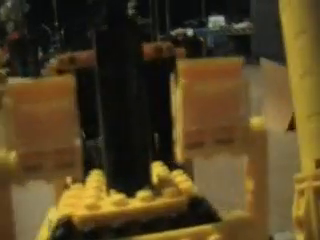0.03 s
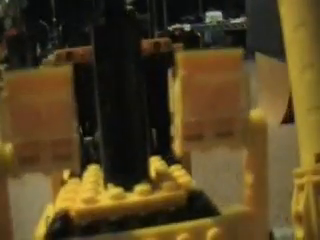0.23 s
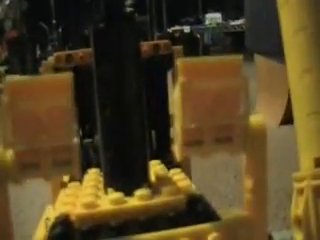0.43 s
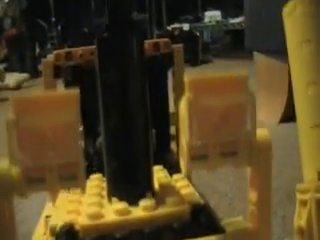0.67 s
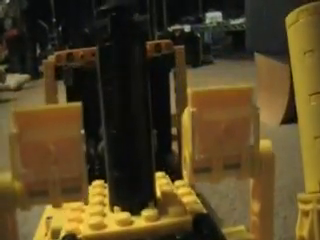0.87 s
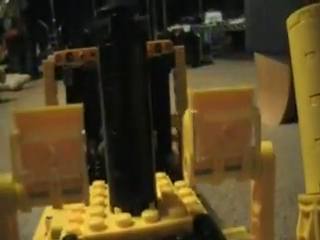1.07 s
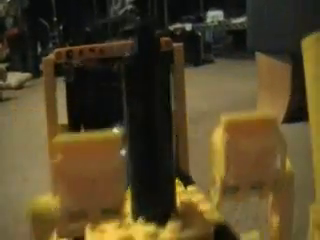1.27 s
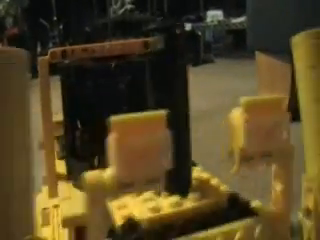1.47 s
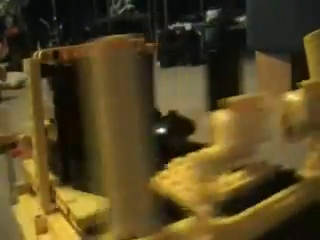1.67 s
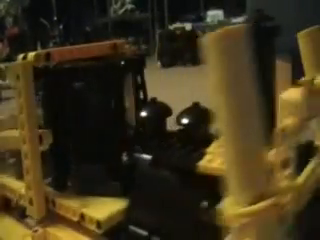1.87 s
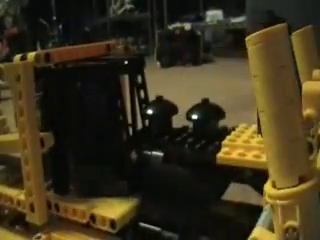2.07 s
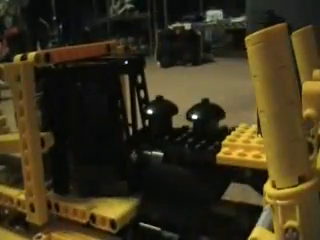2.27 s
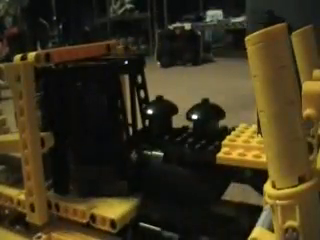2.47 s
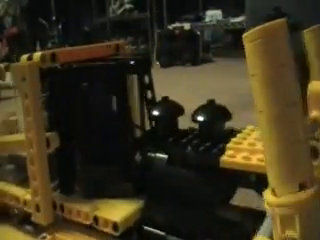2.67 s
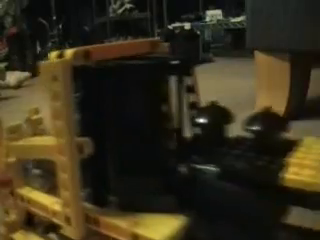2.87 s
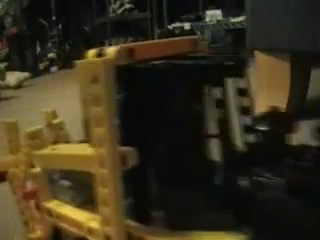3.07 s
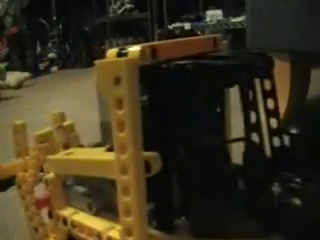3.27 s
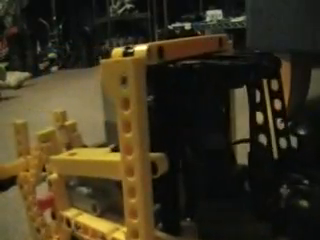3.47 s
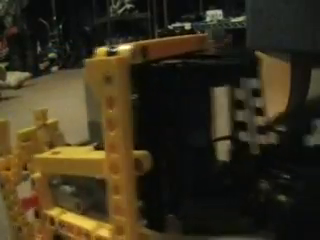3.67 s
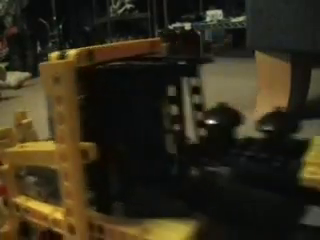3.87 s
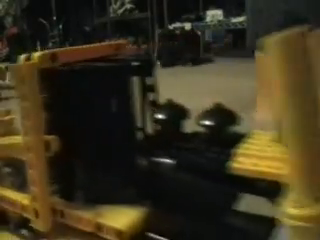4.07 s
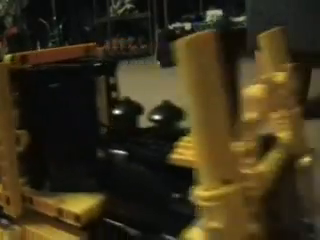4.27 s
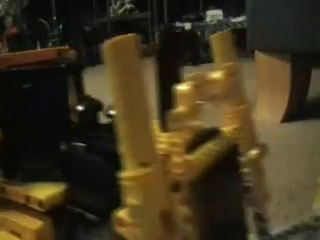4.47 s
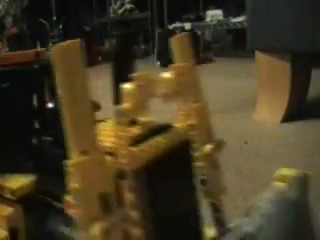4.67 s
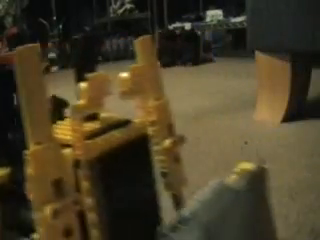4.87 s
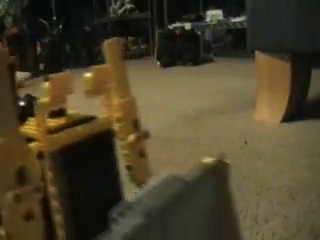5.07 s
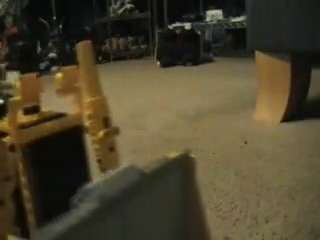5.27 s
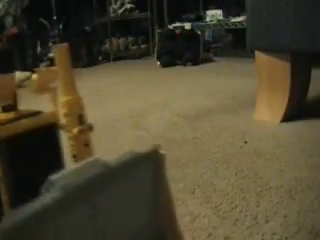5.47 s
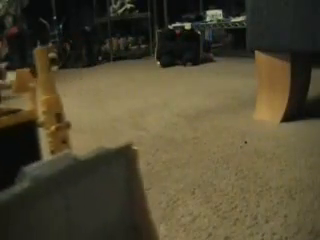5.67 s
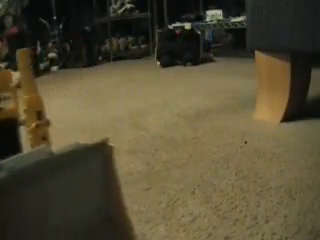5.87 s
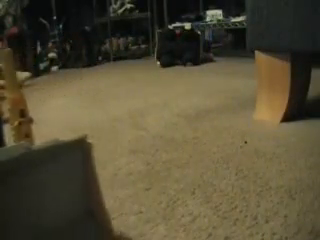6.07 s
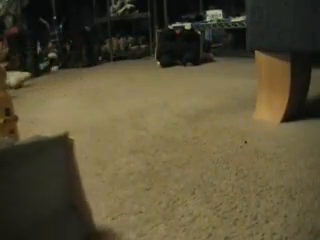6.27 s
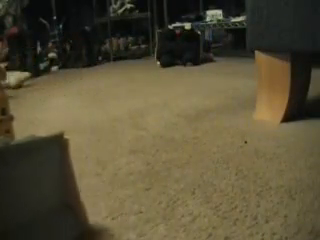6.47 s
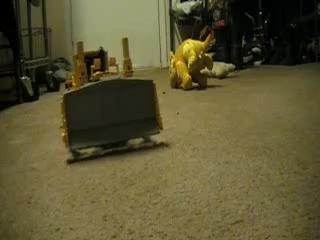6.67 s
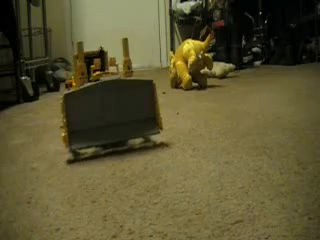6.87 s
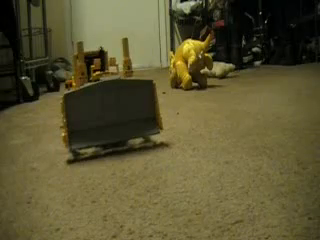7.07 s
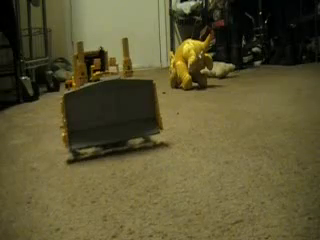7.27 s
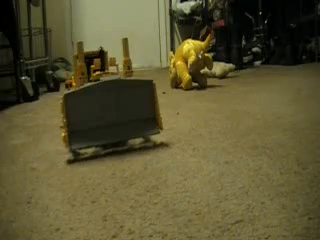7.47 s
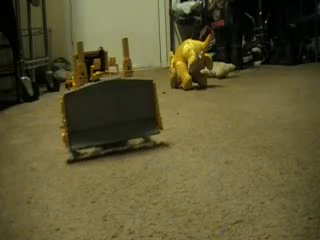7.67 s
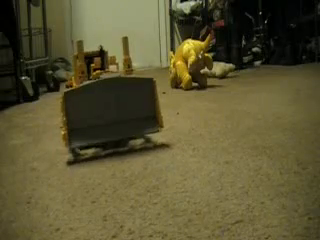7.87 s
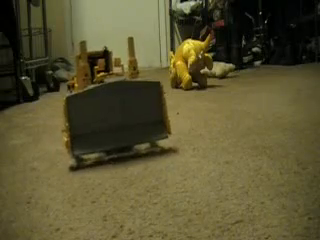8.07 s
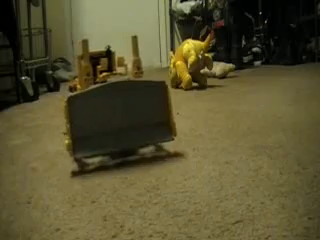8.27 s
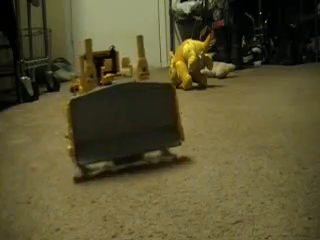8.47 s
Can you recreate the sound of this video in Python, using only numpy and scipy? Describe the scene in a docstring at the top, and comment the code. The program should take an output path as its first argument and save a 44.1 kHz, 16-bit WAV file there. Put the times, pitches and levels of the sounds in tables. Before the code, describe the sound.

Small electric motors and plastic gears whine in jerky runs with ticks and track clatter, near at first, then fainter after a brief dip.

```python
"""A toy bulldozer of plastic bricks jerks about on a carpet close to the microphone, in a room with soft air noise.
Two motors spin up, sag under load and coast; meshing teeth whine and chatter, track links clatter as blow trains,
friction rubs and grinds, a blocked gear ratchets, and loose parts knock and tick as short noise bursts.
The toy turns side-on near 1.6 s, passes near 4.2 s and moves away, its parts fading by powers of distance.
The level dips briefly at 6.7 s and the run in hand ends; then the toy, further off, twitches and drives off again."""
import sys
import numpy as np
from scipy import signal
from scipy.fft import rfft, irfft, next_fast_len
from scipy.io import wavfile
from scipy.ndimage import uniform_filter1d

SR = 44100
rng = np.random.default_rng(int(sys.argv[2]) if len(sys.argv) > 2 else 0)


def master(y):
    """Save y as 16-bit WAV."""
    cut = np.clip(np.atleast_2d(y).T, -1, 1)
    pcm = np.round(cut * 32767)  # scale
    wavfile.write(sys.argv[1], SR, pcm.astype(np.int16))


N = 375732
T = np.arange(N) / SR  # time [s]
DIP_S = (6.695, 6.725)  # start and end of the brief dip in level

# presses of the throttle, levels before distance and mix gains: (on [s], off [s], standstill [s],
# pick-up time constant [s], frame level [dB], teeth level [dB], track level [dB])
THROTTLE_RUNS = [(-.3, 0.365, 0.46, 0.032, -27.5, -30, -40.5), (0.571, 0.663, 0.71, 0.041, -40, -44, -44),
                 (0.714, 0.888, 1.014, 0.023, -43, -47, -44),
                 (1.187, 2.011, 2.17, 0.037, -27, -30.5, -39.5),
                 (2.647, 3.279, 3.5, .13, -30, -32.5, -38.5), (3.559, 6.37, 6.755, 0.11, -27, -30.5, -38),
                 (6.925, 6.98, 7.03, 0.03, -26, -31.5, -50), (7.029, 7.219, 7.6, 0.007, -47, -55.5, -59),
                 (7.827, 8.6, 8.6, 0.11, -27, -31, -40.5)]
# spectrum of the track links: (frequency [Hz], gain [dB])
TRACK_SPECTRUM = [(30, -39), (110, -20), (200, -14), (280, -6), (380, 1.5), (650, 2.5), (1000, 0.5),
                  (1400, 0), (2200, -4), (4000, -36)]
# spectrum of the plastic frame: (frequency [Hz], gain [dB])
FRAME_SPECTRUM = [(100, -58), (900, -28), (1400, -1.5), (1800, -4), (2250, -3), (2700, 0), (3050, -0.5),
                  (3550, 4.5), (4000, 0.5), (4400, 1.5), (5000, -1.5), (6000, -8), (9000, -45.5)]
# spectrum of a sharp tick of small teeth: (frequency [Hz], gain [dB])
TICK_SPECTRUM = [(1000, -21.5), (3500, -14.5), (6400, 3), (8500, -3.5), (11000, -15), (15500, -34.5)]


def undb(db):
    """Decibels to amplitude ratio: 20 dB is a factor of ten."""
    return 10 ** (np.asarray(db) / 20)


def unit(x):
    """Normalisation to a root-mean-square of 1."""
    return x / np.sqrt(np.mean(x ** 2))


def colour(x, points):
    """Linear filtering: each frequency is scaled by a gain interpolated in dB over log frequency."""
    hz, db = np.transpose(points)
    size = next_fast_len(x.shape[-1] + 2048)
    f = np.maximum(np.fft.rfftfreq(size, 1 / SR), 1)
    gain = undb(np.interp(np.log(f), np.log(hz), db))
    return irfft(rfft(x, size) * gain, size)[..., :x.shape[-1]]


def resonance(x, hz, width_hz):
    """Simple resonator: a two-pole band-pass whose Q is centre over bandwidth."""
    return signal.lfilter(*signal.iirpeak(hz, hz / width_hz, fs=SR), x)


def narrow(x, hz, width_hz):
    """Cascaded resonators: the same band-pass twice, for steeper skirts."""
    return resonance(resonance(x, hz, width_hz), hz, width_hz)


def walk(rate):
    """Band-limited fluctuation: a moving average of random steps, rate [1/s], with a spread near 1."""
    hold = max(int(SR / rate), 1)
    steps = np.repeat(rng.standard_normal(N // hold + 1), hold)
    return 1.3 * uniform_filter1d(steps, hold)[:N]


def tone(hz):
    """Phase is the integral of frequency: a sine of rms 1 on a moving pitch."""
    return np.sqrt(2) * np.sin(2 * np.pi * (np.cumsum(hz) / SR + rng.random()))


def room(air_db=0.0):
    """Ambient sound: broadband air noise with a low hum and thin, nearly steady tones; mid and side."""
    # spectrum of the air noise: (frequency [Hz], gain [dB])
    air_spectrum = [(15, -58.5), (25, -35), (38, -25), (96, -17), (129, -10), (209, -11), (233, -6.5),
                    (267, -8.5), (919, -11), (1110, -5.5), (1240, -11.5), (7910, -23.5), (11800, -39),
                    (15500, -46)]
    # room tones: (frequency [Hz], waver [Hz], rms level in the mid [dB])
    room_tones = [(118.9, 1.2, -79.5), (244.4, 2.5, -84.5), (1083, 3, -70), (7770, 110, -77.5)]
    # filter that makes the side of the room: (frequency [Hz], gain [dB])
    room_side = [(60, -3), (110, -3), (200, 0.5), (380, 5.5), (700, 5.5), (1290, 1), (2380, 3.5),
                 (4400, -1.5), (8120, -0.5), (15000, 0)]
    level_db = -62.5 + air_db + 0.81 * walk(4.7)
    air = unit(colour(rng.standard_normal((2, N)), air_spectrum)) * undb(level_db)
    mid, side = (part + sum(undb(db) * tone(hz + waver * walk(3 * waver)) for hz, waver, db in room_tones)
                 for part in air)
    return np.array([mid, colour(side, room_side)])


def throttle():
    """Timing of the drive: time since the latest switch-on [s], and share of its coast done (0-1)."""
    runs = np.array(THROTTLE_RUNS)
    latest = np.maximum(np.searchsorted(runs[:, 0], T) - 1, 0)
    on, off, still, *_ = runs[latest].T
    return np.maximum(T - on, 0), np.clip((T - off) / (still - off), 0, 1)


def effort(on, off, still, pick_up_s, pick_up_power=1.38):
    """Exponential build-up and decay: drive swells, fades while coasting, then slack gears settle."""
    coast_db, settle_db, settle_s = -15, -24.5, 0.22  # level at standstill; level and decay time of settling
    swell = (1 - np.exp(-np.maximum(T - on, 0) / pick_up_s)) ** pick_up_power
    fade = undb(np.interp(T, [off, still, still + 0.013], [0, coast_db, settle_db]))
    settling = np.exp(-np.maximum(T - still, 0) / settle_s)
    # a run begun before the dip ends at its start
    before_dip = T < (DIP_S[0] if on < DIP_S[0] else np.inf)
    return before_dip * swell * fade * settling


def drive_levels(hz, side_on, track_falloff=0.53, frame_falloff=1.006, teeth_falloff=1.694,
                 turned_frame_db=-4, turned_teeth_db=9, teeth_speed_power=1.34):
    """Spreading loss: gains of tracks, frame and teeth follow powers of distance; side-on bares the gears."""
    # the gears bite harder or ease off: (time [s], half length to 1/e of the dB change [s], teeth change [dB])
    surges = [(1.97, 0.066, 1.5), (2.784, 0.075, -4), (2.856, 0.0088, 4.5), (2.924, 0.064, 4),
              (3.134, 0.051, 1.5), (3.678, 0.059, -3.5), (4.07, 0.048, 1)]
    # how far off the toy is: (time [s], distance [m])
    distance = [(0, 0.13), (1.5, 0.16), (1.8, 0.2), (2, 0.17), (3.2, 0.13), (3.8, .16), (4.4, .15),
                (4.8, 0.18), (5.35, 0.3), (6.3, 0.42), (6.75, 0.56), (8.52, 0.58)]
    near_m = 0.14  # the run levels hold at this distance
    free_hz = 887.3  # tooth rate at which the teeth levels hold
    take_up_s, take_up_db = .13, -7  # gears take up their slack before the tracks roll fully
    # overlapping runs add as energies
    energies = sum(np.outer(undb(run[4:]), effort(*run[:4])) ** 2 for run in THROTTLE_RUNS)
    frame, teeth, track = np.sqrt(energies)
    surge_db = sum(db * np.exp(-((T - s) / length) ** 2) for s, length, db in surges)
    near = near_m / np.interp(T, *np.transpose(distance))
    rolling = undb(take_up_db * np.exp(-(throttle()[0] / take_up_s) ** 2))
    speed = (hz / free_hz) ** teeth_speed_power
    return (track * rolling * near ** track_falloff,
            frame * undb(turned_frame_db * side_on) * near ** frame_falloff,
            teeth * undb(surge_db + turned_teeth_db * side_on) * near ** teeth_falloff * speed)


def motor(curve, slack_db=-16, coast_power=1.6):
    """Motor under load: tooth rate, whine level and brightness; it spins up, sags, coasts; slack gears hush."""
    start_hz, stall_hz = 600.7, 542.1  # tooth rates at switch-on and at the end of the coast
    spin_up_s, hunt_hz = .033, 5  # time constant; slow wander
    since, coast = throttle()
    s, *columns = np.transpose(curve)
    loaded_hz, whine_db, bright_db = (np.interp(T, s, column) for column in columns)
    starting = np.exp(-since / spin_up_s)
    running = loaded_hz + (start_hz - loaded_hz) * starting + hunt_hz * walk(12)
    hz = running + (stall_hz - running) * coast ** coast_power
    return hz, whine_db + slack_db * np.maximum(starting, coast), bright_db


def contacts(cycles, scatter_db, jitter, ring_s):
    """Impact train: one blow a cycle, uneven in time and strength, each decaying with time constant ring_s."""
    count = np.arange(int(cycles[-1]))
    chance = rng.standard_normal((16000, 2))[count]
    at = np.interp(count + jitter * chance[:, 0], cycles, np.arange(N)).astype(int)
    energy = np.bincount(at, undb(scatter_db * np.clip(chance[:, 1], -2.5, 2.5)) ** 2, N)
    ringing = signal.lfilter([1], [1, -np.exp(-2 / (ring_s * SR))], energy)
    return unit(np.sqrt(ringing))


def mesh_whine(mesh, orders, bright_db, rasp, waver_db=2.5):
    """Harmonics of the tooth rate: uneven teeth modulate each, and hard biting lifts the upper ones."""
    # spectrum of the whine: (frequency [Hz], gain [dB])
    whine_spectrum = [(600, 2), (1400, -2), (1900, -1.5), (2150, -1.5), (2400, -4.5), (2700, 6),
                      (3100, 4.5), (3550, 4), (4200, 2), (4800, 1), (5400, 3), (6700, 3), (11000, 1.5)]
    gains = [undb(db + bright_db * np.clip(k - 4, -2, 2)) for k, db in orders]
    tones = 0
    for gain, (k, _) in zip(gains, orders):
        uneven = undb(waver_db * walk(70)) * (1 + rasp * walk(350))
        tones = tones + gain * uneven * np.sin(2 * np.pi * (round(k) * mesh + rng.random()))
    return colour(tones / np.sqrt(sum(gain ** 2 for gain in gains)), whine_spectrum)


def gear_train(drive, orders, wobble=0.0046, bind_db=0.8):
    """Gear-mesh modulation: one motor's whine, and the envelopes of its tooth and track-link blows."""
    # how roughly the gears mesh: (time [s], roughness [0-1])
    roughness = [(.4, .48), (1.2, .8), (1.42, .8), (1.55, .55), (2.1, .55), (2.7, .38), (4, .38), (4.3, .5),
                 (6.4, .5), (7.9, .7), (8.5, .55)]
    hz, whine_db, bright_db = drive
    shaft = np.cumsum(hz) / SR / 60 + rng.random()  # turns, of 60 teeth each
    # backlash makes the mesh flutter; an eccentric gear speeds and slows it once a shaft turn
    rough = np.clip(np.interp(T, *np.transpose(roughness)), 0, 1)
    flutter = .015 * rough * walk(200)
    mesh = np.cumsum(hz * (1 + flutter + wobble * np.sin(2 * np.pi * shaft))) / SR
    # tight spots come round again on every turn
    spots = rng.standard_normal(14)
    places = np.arange(len(spots)) / len(spots)
    binding = undb(bind_db * np.interp(shaft, places, unit(spots - spots.mean()), period=1))
    teeth = contacts(mesh, scatter_db=3.0, jitter=0.13, ring_s=0.0028) * binding
    # at a crawl the slack gears catch and let go in separate clicks
    crawl = np.clip((640 - hz) / 130, 0, .7)
    clicks = contacts(mesh / 6, scatter_db=2, jitter=0.7, ring_s=0.0012)
    teeth = np.sqrt((1 - crawl) * teeth ** 2 + crawl * clicks ** 2)
    # the track surges once a shaft turn
    surge = undb(3.2 * np.sin(2 * np.pi * shaft))
    links = contacts(mesh / 4, scatter_db=2.5, jitter=.4, ring_s=0.0189) * surge * binding
    whine = unit(mesh_whine(mesh, orders, bright_db, rough) * binding) * undb(whine_db)
    return whine, teeth, links


def rattle(envelope, spectrum):
    """High modal density: blows on a plastic part ring as shaped noise; rows are mid and side."""
    return unit(colour(envelope * rng.standard_normal((2, N)), spectrum))


def clacks(hz, surge_db=3.5):
    """Impact excitation of modes: three links a shaft turn, one hardest, ring the frame; mid and side."""
    # frame resonances rung by single links: (centre [Hz], width [Hz], level [dB])
    link_modes = [(378, 140, -9), (660, 240, -6), (880, 260, -8.5), (1420, 500, -11), (1785, 400, -7)]
    turns = np.cumsum(hz) / SR / 60
    blows = contacts(3 * turns, scatter_db=1.8, jitter=.15, ring_s=0.011)
    blows = blows * undb(surge_db * np.cos(2 * np.pi * turns))
    return sum(undb(db) * unit(narrow(blows * rng.standard_normal((2, N)), centre, width))
               for centre, width, db in link_modes)


def bulldozer(close, side_on, whine_db=0, track_db=-2.0, clack_db=-3, frame_db=-2.0, teeth_db=-0.35,
              second_db=-6, panel_db=-3, growl_db=-10):
    """Superposition: both gear trains whine and chatter in one frame, over the clatter of the tracks."""
    # load on each motor, slowing as tracks drag and racing as they let go, before spin-up and coasting:
    # (time [s], tooth rate [Hz], whine level [dB], brightness [dB per overtone])
    first_curve = [(0, 927, -2, 5.5), (.06, 915, 1, 3), (.13, 880, -4, 1), (.2, 882, -3, 3),
                   (.26, 898, -5, 0.5), (.33, 900, -1, 0), (.6, 875, -6, -5), (.9, 859.5, -4, -4.5),
                   (1.21, 898, -3, -8.5), (1.28, 925, -5, 1), (1.35, 955, -6, 1), (1.4, 1001, 0, 0),
                   (1.44, 910, -8, 0), (1.54, 900, -1, -1), (1.63, 910, -4.5, -2), (1.77, 895, -7, 0),
                   (1.97, 895, -4, 5.5), (2.67, 780, -12, 0), (2.72, 795, 0, 1), (2.76, 832, 4, 1),
                   (2.81, 816, 2, 1), (2.87, 766, -5, 0), (2.93, 765, 0, -1), (2.975, 812, 6.5, -0.5),
                   (3.045, 876, 4.5, -0.5), (3.16, 891, 5.5, 0), (3.28, 925, 1, 0), (3.42, 915, 3, 0),
                   (3.625, 775, 5, 0), (3.68, 830, 4, 1), (3.735, 770, 2, 0), (3.79, 793, -9, 4),
                   (3.86, 795, -6, 2), (3.96, 844.6, -10, 4), (4.12, 895, -5, 0), (4.22, 872, -1, 1),
                   (4.35, 903, -2, 2), (4.5, 872, -1, 2), (4.68, 892, 0.5, 3), (4.83, 879, 0, -0.5),
                   (5.01, 896, -2, 0), (5.3, 885, -10, -4), (5.6, 888, -6, -2), (5.85, 880, -1, 0),
                   (6.4, 883, -0.5, 1), (6.95, 849.7, -12, 0), (7.2, 888, -10, 1), (7.85, 778, -12, 0.5),
                   (8.04, 776, 1, -1.5), (8.11, 825.4, -2, -0.5), (8.23, 945, 0, 0.5), (8.33, 904, 0, 3),
                   (8.44, 886, 0, 1.5), (8.51, 930, 1, -1)]
    second_curve = [(0, 772, 0.5, -4), (.05, 739, 3.5, -2), (.13, 685, 3.5, -1.5), (.21, 682, 1.5, 0.5),
                    (.28, 635, 2.5, -2), (.36, 633, -1, 0.5), (.6, 600, -21, -4), (.9, 572, -17, -3),
                    (1.24, 793, -5, 0), (1.28, 822, -4, 1), (1.33, 877, -4, 2.5), (1.41, 830, -1, 0.5),
                    (1.5, 854.7, -10, 2), (2, 885, -8.5, 3), (2.72, 805.4, -11, 4.5), (2.9, 900, -2, 2),
                    (3.25, 891, -10, -1), (3.6, 719, -3, 3), (3.635, 760, -1, 2), (3.675, 826, 3, 2),
                    (3.715, 795, 7, 4), (3.755, 675, 5, 6), (3.8, 612.3, 2, 6), (3.87, 630, 1, 5.5),
                    (3.95, 700, 0, 5), (4, 800, -9, 1), (4.06, 930, 0.5, 0), (4.12, 922.5, -7, -3),
                    (4.22, 872, -1.5, 0), (4.35, 903, -1, 0), (4.5, 872, -4, 0), (4.68, 890, 0, 0),
                    (4.83, 878, -4, -1), (5.02, 895, -4, -1), (5.15, 884, -7, -1), (5.3, 890, -4, -2),
                    (5.55, 884, -9, -1), (5.9, 892, -4, -2), (6.4, 882, -6, -1), (7.1, 792, -8, 2.5),
                    (7.95, 799, -3, -5.5), (8.12, 848, -1, 1), (8.22, 909, -6, 5), (8.37, 859, -5, 0.5),
                    (8.52, 929, -5, 2)]
    # overtones of the two gear meshes: (multiple of the tooth rate, level [dB])
    first_orders = [(1, -11), (2, -0.5), (3, -15.5), (4, 5), (5, -4), (6, -6), (7, -3), (8, -13.5),
                    (10, -12)]
    second_orders = [(1, -21), (2, -8.5), (3, 0), (4, -3.5), (5, 0), (6, -4), (7, -7), (8, -8), (9, -18.5),
                     (10, -20.5)]
    # spectra of the tooth chatter, toy alongside and toy ahead: (frequency [Hz], gain [dB])
    chatter_close = [(300, -67.5), (3500, -3), (5000, -7.5), (6000, -1), (6900, 4), (7700, -2), (8500, -4),
                     (10000, -8), (12000, -19), (15500, -34.5)]
    chatter_ahead = [(300, -69), (3500, -32), (5000, -11.5), (6100, -0.5), (7000, 2), (7700, -4),
                     (8800, -1), (10000, -12), (12000, -17), (15500, -35)]
    first, second = motor(first_curve), motor(second_curve)
    track_gain, frame_gain, teeth_gain = drive_levels((first[0] + second[0]) / 2, side_on)
    whine_a, teeth_a, links_a = gear_train(first, first_orders)
    whine_b, teeth_b, links_b = gear_train(second, second_orders)
    teeth = np.hypot(teeth_a, undb(second_db) * teeth_b)
    links = np.hypot(links_a, undb(second_db) * links_b)
    whine = undb(whine_db) * (whine_a + whine_b)
    frame = np.outer([1, 0], whine) + rattle(teeth, FRAME_SPECTRUM)  # the whine is in the mid alone
    # a panel ring stands out at first and fades from 1.8 to 2.6 s
    panel = np.interp(T, [1.8, 2.6], [1, 0]) * resonance(frame, 1770, 250)
    frame = frame + undb(panel_db) * panel
    chatter = np.sqrt(close) * rattle(teeth, chatter_close) + np.sqrt(1 - close) * rattle(teeth, chatter_ahead)
    clatter = undb(track_db) * rattle(links, TRACK_SPECTRUM) + undb(clack_db) * clacks(first[0])
    # after the dip, further off, the tracks also growl in the hollow body
    growl = unit(narrow(links * rng.standard_normal((2, N)), 375, 150))
    clatter = clatter + undb(growl_db) * (T > DIP_S[1]) * growl
    return track_gain * clatter + undb(frame_db) * frame_gain * frame + undb(teeth_db) * teeth_gain * chatter


def rubs():
    """Friction-driven resonance: noise feeds one band, swelling and fading; mid and side."""
    # low drags on the carpet, dry scrapes and thin axle squeaks:
    # (centre time [s], half length to 1/e^2 [s], centre [Hz], width [Hz], rms level at the crest [dB])
    rub_events = [(.2, 0.45, 176, 70, -60.5), (0.303, .016, 6600, 150, -30),
                  (0.391, 0.0037, 6510, 400, -25), (0.55, .09, 1720, 600, -57), (0.54, .1, 3550, 700, -60),
                  (0.5, .12, 430, 250, -62), (0.73, 0.18, 1700, 650, -52.5), (0.67, .08, 3705, 400, -47),
                  (0.838, 0.11, 202.2, 70.4, -53.5), (0.882, 0.058, 890, 604.3, -40),
                  (1.426, 0.27, 180, 70, -60.5), (2.17, .06, 2500, 5000, -47),
                  (2.273, 0.26, 900, 1600, -57), (2.32, 0.07, 4350, 5800, -62.5),
                  (6.674, .022, 1700, 2000, -47), (6.678, 0.018, 150, 80.2, -54),
                  (2.715, .03, 730, 160, -48), (3.3, .14, 3600, 420, -37), (4.07, .05, 6550, 450, -30),
                  (6.997, .014, 5030, 300, -48), (7.148, 0.15, 450, 220, -67), (7.18, .15, 2430, 380, -63),
                  (7.18, 0.18, 4420, 350, -63.5), (7.159, .17, 5400, 603, -65),
                  (7.415, 0.073, 5200, 3000, -65)]
    out = np.zeros((2, N))
    for s, length, hz, width, db in rub_events:
        ring = narrow(rng.standard_normal((2, N)), hz, width)
        out += undb(db) * unit(ring) * np.exp(-2 * ((T - s) / length) ** 2)
    return out


def jolts():
    """Simultaneous impacts: a track catches and jumps, shaking all its links at once; mid and side."""
    # jolts of the tracks: (centre time [s], half length to 1/e [s], mid level [dB], side minus mid [dB])
    jolt_events = [(0.146, 0.015, -25.5, 3), (0.358, 0.06, -39, -1.5), (1.245, .025, -40, -2),
                   (1.369, 0.022, -33.5, 0), (1.47, 0.013, -29, 2), (1.567, .015, -34, 0),
                   (1.651, .012, -35, -13), (1.767, .012, -35, -8), (2.099, 0.063, -44, -15),
                   (2.928, 0.043, -34, 6.5), (3.245, 0.0058, -29, -18), (3.58, 0.062, -51.5, -12),
                   (3.994, 0.17, -39.5, -21), (6.659, 0.021, -49, -15.5)]
    mid, side = unit(colour(rng.standard_normal((2, N)), TRACK_SPECTRUM))
    gain, side_gain = sum(np.outer(undb([db, db + width_db]), np.exp(-((T - s) / length) ** 2))
                          for s, length, db, width_db in jolt_events)
    return np.array([gain * mid, side_gain * unit(narrow(side, 750, 700))])


def blow(t60, tail_db, tail_t60):
    """Two-stage decay: a noise burst dies fast over a faint longer tail, times to -60 dB [s]; mid and side."""
    t = T[:SR // 4]
    decay = undb(-60 * t / t60) + undb(tail_db - 60 * t / tail_t60)
    return rng.standard_normal((2, len(t))) * decay


def add(out, s, sound, db):
    """Superposition: mix in a sound at a time [s], its mid scaled to a peak level [dB]."""
    i = int(s * SR)
    out[:, i:i + sound.shape[1]] += (undb(db) * sound / np.abs(sound[0]).max())[:, :N - i]


def loose_parts(tick_db=-1, knock_db=1, crack_db=-17):
    """Impact sound: bright ticks of slipping teeth and duller knocks; small parts radiate little bass."""
    # ticks of gears slipping and settling, before tick_db: (time [s], peak level [dB], dull part [dB])
    tick_events = [(0.5089, -39, -5), (0.5442, -41, 8), (0.5636, -38, -4), (0.5918, -24.5, -2),
                   (0.7028, -29, 0), (0.7412, -27, -6), (0.7659, -22, -8), (0.8031, -23, -2),
                   (0.8495, -31, -2), (0.9655, -34, 3), (0.979, -29.5, -4), (0.9956, -31, -1),
                   (1.0645, -32, -4), (1.1507, -41, 13), (1.1914, -34, 10), (1.2018, -22, 1),
                   (1.3194, -16, 0), (1.4144, -14, 0), (2.0924, -10.5, -15), (2.106, -13, 2),
                   (2.1604, -31, 0), (2.212, -10.5, -6), (2.2278, -25, -10.5), (2.2446, -29, -17),
                   (2.2604, -23.5, -22), (2.273, -31, -18), (2.2887, -26, -20), (2.3644, -33, 2),
                   (2.383, -40, -6), (2.393, -39, 0), (2.43, -40, -11), (2.4582, -42, -4),
                   (2.4956, -34, -20), (2.668, -30, 2), (2.74, -21, 0), (3.0954, -12, -10),
                   (3.1514, -11, -10), (3.3974, -21, -12), (3.449, -27, -18), (3.46, -15.5, -22),
                   (3.4647, -22, -20), (3.472, -20.5, -37), (3.543, -30.5, -3), (3.5887, -26, -5),
                   (6.6092, -51, -13), (7.442, -47, 6)]
    # knocks of loose parts, before knock_db: (time [s], peak level [dB], centre [Hz], decay to -60 dB [s])
    knock_events = [(0.14, -12, 2000, 0.039), (1.355, -23, 2450, 0.03), (2.106, -30, 600, 0.021),
                    (2.577, -35, 1493, 0.032), (2.738, -38, 578.7, 0.03), (2.763, -22.5, 1430, 0.02),
                    (2.899, -17.5, 585, 0.06), (3.242, -16.5, 1412, 0.029), (7.65, -35, 1710, 0.03)]
    out = np.zeros((2, N))
    for s, db, dull_db in tick_events:
        burst = blow(t60=0.0092, tail_db=-22.5, tail_t60=0.069)
        dull = undb(dull_db) * resonance(burst, 1680, 1300)
        add(out, s, colour(burst, TICK_SPECTRUM) + dull, db + tick_db)
    for s, db, hz, t60 in knock_events:
        burst = blow(t60, tail_db=-23, tail_t60=.17)
        crack = undb(crack_db) * colour(burst, TICK_SPECTRUM)
        add(out, s, resonance(burst, hz, 0.34 * hz) + crack, db + knock_db)
    return signal.sosfilt(signal.butter(3, 260, "high", fs=SR, output="sos"), out)


def grinds(flutter=.018, rasp=.55):
    """Frequency and amplitude modulation: scraping teeth give short gliding, rasping tones; mid and side."""
    # grinding teeth: (centre time [s], half length to 1/e^2 [s], pitch [Hz], glide [Hz/s], rms level at crest [dB])
    grind_events = [(0.19, .06, 3490, -300, -29), (0.31, .06, 3300, -600, -29),
                    (1.252, .025, 1560, 3500, -42), (1.305, .045, 1330, 2000, -42),
                    (1.32, .035, 3430, 1500, -38), (1.385, .05, 1080, 1800, -39),
                    (1.395, .035, 1420, 3000, -41), (1.4, .04, 2530, 600, -41),
                    (1.415, .04, 3340, -2000, -36), (1.745, .045, 1820, -3800, -42),
                    (1.915, .04, 4430, 1200, -36), (2.0, .04, 4490, -1500, -34),
                    (2.0, .025, 1240, 500, -42), (2.965, .025, 2390, 1000, -39),
                    (3.17, .05, 2700, -400, -38), (3.92, .05, 4680, 5000, -38), (4.0, .04, 3130, 3500, -37)]
    wander, grain = 1 + flutter * walk(300), 1 + rasp * walk(250)
    sound = 0
    for s, length, hz, glide, db in grind_events:
        swell = np.exp(-2 * ((T - s) / length) ** 2)
        sound = sound + undb(db) * swell * tone((hz + glide * (T - s)) * wander)
    return np.outer([1, 0], grain * sound)


def ratchets(scatter_db=2, ends_db=-7, frame_db=-6):
    """Periodic impacts: an even row of clicks, hardest near the middle, rings the frame; mid and side."""
    # a blocked gear skips from tooth to tooth, before scatter:
    # (start [s], length [s], click rate [1/s], peak level in the middle [dB])
    ratchet_events = [(0.6095, 0.068, 127, -24), (0.741, 0.085, 122, -26)]
    out = np.zeros((2, N))
    for s, length, rate, db in ratchet_events:
        for after in np.arange(0, length, 1 / rate):
            burst = blow(t60=0.011, tail_db=-24, tail_t60=0.05)
            force_db = ends_db * (2 * after / length - 1) ** 2 + scatter_db * rng.standard_normal()
            click = colour(burst, TICK_SPECTRUM) + undb(frame_db) * colour(burst, FRAME_SPECTRUM)
            add(out, s + after, click, db + force_db)
    return out


def scene(facing_low_db=4, turned_low_db=-20, facing_high_db=-2, turned_high_db=-11, abreast_db=14):
    """Mid-side stereo: clatter is wide while facing, chatter as gears pass; turning narrows both bands."""
    # filter that makes the broad side of the toy: (frequency [Hz], gain [dB])
    toy_side = [(60, -5), (110, -5), (200, -7.5), (380, -16), (700, -14.5), (1290, -21), (2380, -13.5),
                (4400, -14), (8120, -10.5), (15000, -1)]
    # balance of the channels: (frequency [Hz], left filter minus right filter [dB])
    tilt = [(60, -5), (110, 0.5), (200, -1), (380, -0.5), (700, 0.5), (1290, 0), (2380, 0.5), (4400, -0.1),
            (7000, 2), (8800, -3.5), (15000, -1)]
    side_on = np.interp(T, (1.48, 1.794), [0, 1])  # the toy turns side-on
    close = np.interp(T, (3.97, 4.48), [1, 0])  # it moves from alongside to ahead
    abreast = np.exp(-((T - 3.55) / .6) ** 2)  # the open gears sweep past the microphone
    mid, side = bulldozer(close, side_on) + loose_parts() + rubs() + grinds() + ratchets()
    low_db = np.interp(side_on, [0, 1], [facing_low_db, turned_low_db])
    high_db = np.interp(side_on, [0, 1], [facing_high_db, turned_high_db]) + abreast_db * abreast
    low, high = undb(low_db) * narrow(side, 815, 730), undb(high_db) * narrow(side, 8500, 2800)
    side = colour(side, toy_side) + low + high
    mid, side = np.array([mid, side]) + jolts() + room()
    return np.array([colour(mid + sign * side, [(hz, sign * db / 2) for hz, db in tilt]) for sign in (1, -1)])


def record(dry):
    """Gain and low-pass filtering: the level dips 16 dB for an instant, and the top above 15.7 kHz is cut."""
    dip = uniform_filter1d(1. * ((T > DIP_S[0]) & (T < DIP_S[1])), size=400)
    low_pass = signal.ellip(10, .2, 70, 15700, fs=SR, output="sos")
    return signal.sosfilt(low_pass, dry * undb(-16 * dip))


dry = scene()
out = record(dry)
master(out)
```